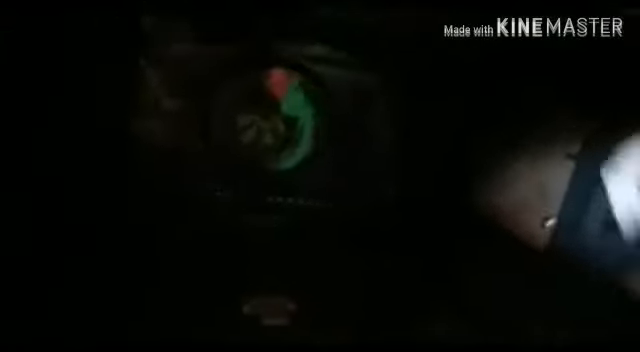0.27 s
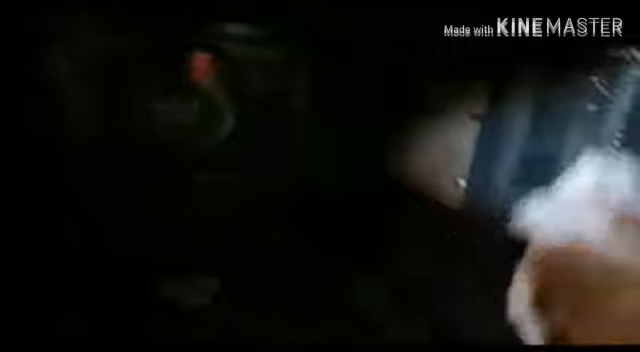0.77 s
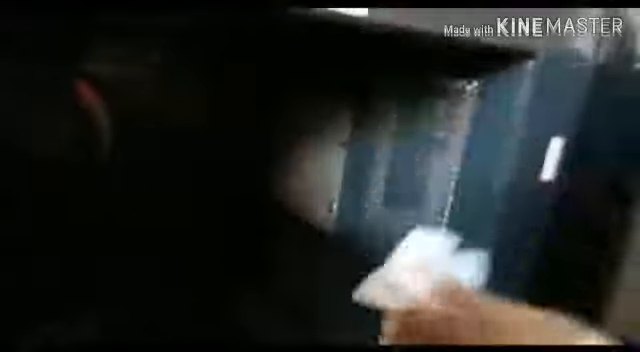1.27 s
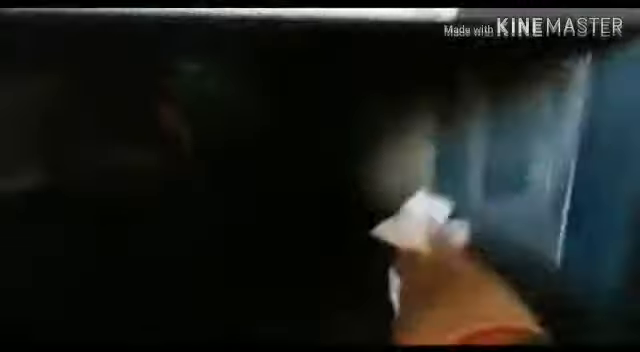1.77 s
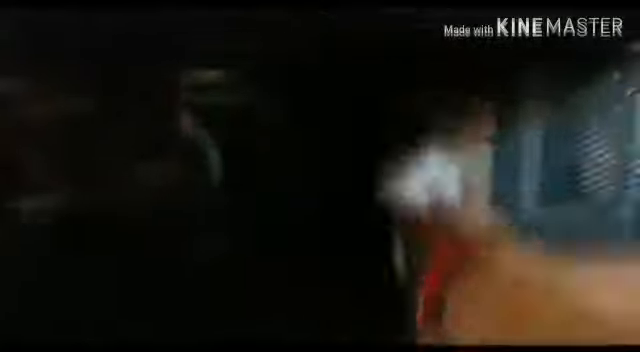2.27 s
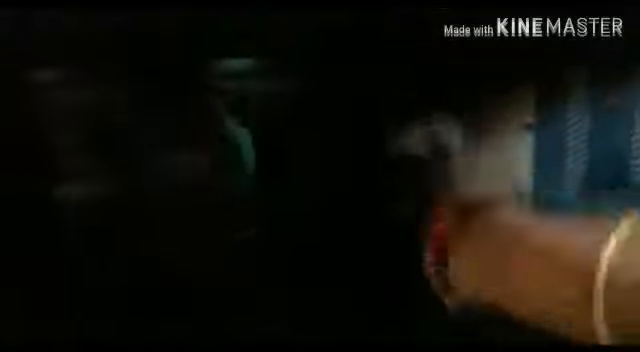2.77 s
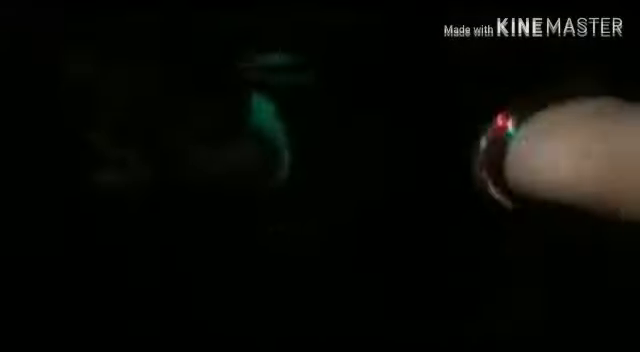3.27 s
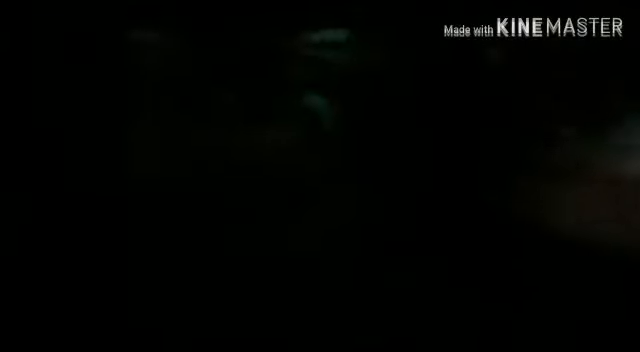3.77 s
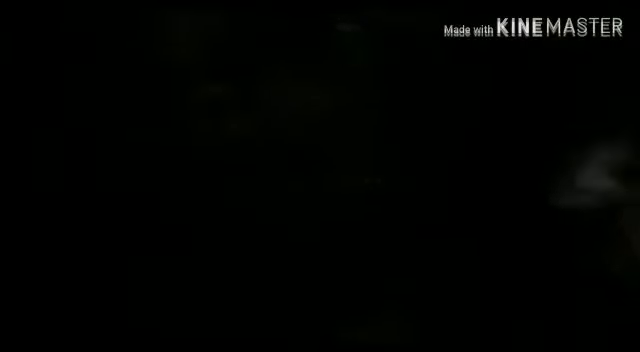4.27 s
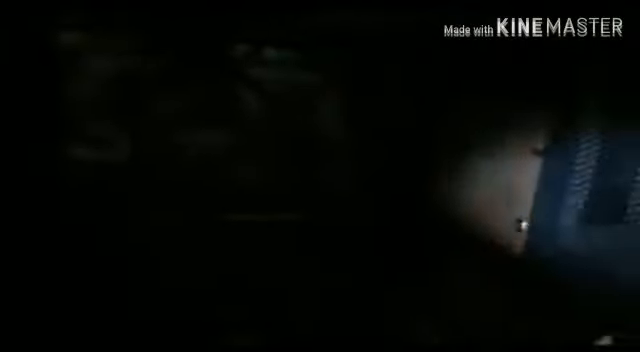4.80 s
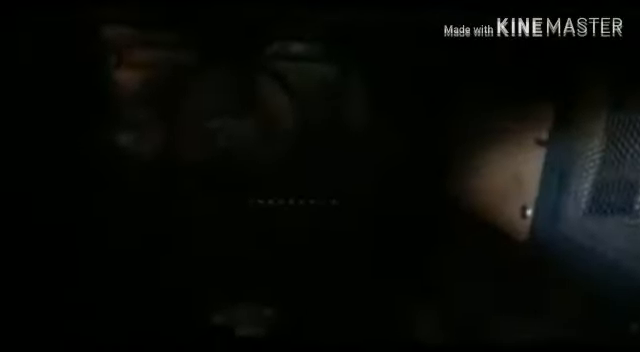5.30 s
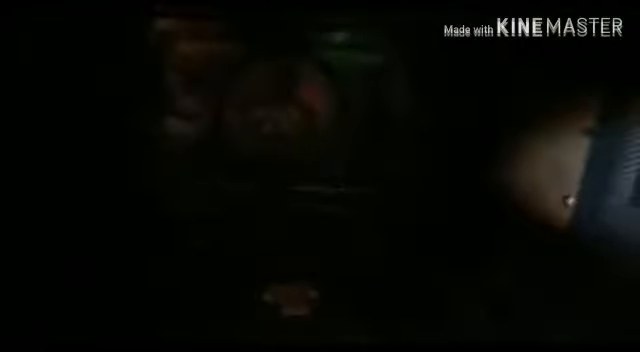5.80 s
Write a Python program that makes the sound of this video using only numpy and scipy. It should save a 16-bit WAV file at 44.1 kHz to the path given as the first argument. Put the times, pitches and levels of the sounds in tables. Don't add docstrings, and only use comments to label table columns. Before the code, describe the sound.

Close wet wiping strokes hiss inside an oven, with bangles tinkling on a wrist and a few hard clacks and hollow knocks.

```python
import sys
import numpy as np
from scipy import signal
from scipy.fft import rfft, irfft, next_fast_len
from scipy.io import wavfile
from scipy.ndimage import map_coordinates

SR = 44100
rng = np.random.default_rng(int(sys.argv[2]) if len(sys.argv) > 2 else 0)


def dump(signal):
    limited = np.clip(np.atleast_2d(signal).T, -1, 1)
    pcm = np.round(limited * 32767).astype(np.int16)
    wavfile.write(sys.argv[1], SR, pcm)


def gain_from_db(level_db):
    decades = np.asarray(level_db, float) / 20
    return 10 ** decades


N = 266628

# start_s, peak_db, upper_modes_db (re peak), panel_pitch_ratio
KNUCKLES = [(0.001, -43.5, -4.5, 0.88), (1.632, -36.5, 4, 1.02), (1.7462, -21.5, -8, 0.9),
            (1.756, -16, -14, 0.98), (2.374, -35.5, -15, 0.94), (2.758, -33, -3, 1),
            (2.877, -26.5, -6, 1.1), (2.892, -19.5, -25, 0.96), (3.8805, -5.5, -3, 1),
            (3.976, -18, -11, 0.92), (4.079, -33, 1, 1.11), (4.525, -33.5, -13, 0.99),
            (4.622, -51, 14, 0.85), (4.942, -32.5, -11, 1.04), (4.995, -51, -30, 0.89),
            (5.103, -44, -6, 0.99), (5.459, -41, -6, 0.87), (5.485, -30, -11, 0.97)]


def unit(x):
    return x / np.sqrt(np.mean(x ** 2) + 1e-20)


def along(points, hz):
    f, v = np.transpose(points)
    return np.interp(np.log(hz + 1), np.log(f + 1), v)


def wobble(rate):
    return map_coordinates(rng.standard_normal(N // 100 + 9), [np.arange(N) * rate / SR])


def filtered(x, response):
    m = next_fast_len(len(x) + SR // 4)
    return irfft(rfft(x, m) * response(np.fft.rfftfreq(m, 1 / SR)), m)[:len(x)]


def resonances(peaks):
    def response(f):
        total = 0
        for k, (centre, width, db) in enumerate(peaks):
            damping = 1j * f * width
            total = total + (-1) ** k * gain_from_db(db) * damping / (centre ** 2 - f ** 2 + damping)
        return total
    return response


def coloured(spectrum):
    return unit(filtered(rng.standard_normal(N + SR), lambda hz: gain_from_db(along(spectrum, hz))))


def rub(spectrum, grain_db):
    grains = rng.standard_normal(N) * gain_from_db(grain_db * wobble(300))
    return unit(filtered(grains, lambda hz: gain_from_db(along(spectrum, hz))))


def add(track, s, sound):
    track[round(s * SR):][:len(sound)] += sound


def ring(modes, t, damping, scatter_db, blur):
    hz, db, t60 = np.transpose(modes)[:, :, None]
    level_luck, pitch_luck = rng.standard_normal((2, len(modes), 1))[::-1]
    steps = rng.standard_normal((len(modes), len(t) // 16 + 1))
    steps = np.repeat(steps, 16, axis=1)[:, :len(t)]
    wander = blur * np.cumsum(steps, axis=1) / 4
    wave = np.sin(2 * np.pi * hz * (1 + 0.0048 * pitch_luck) * t + wander)
    return gain_from_db(db + scatter_db * level_luck - 60 * t * damping / t60) * wave


def swells(rows, peak, ease, rest_db):
    edge_db = 18
    t = np.arange(0, N + 32, 32) / SR
    peak = np.clip(peak, .05, .95)
    power = gain_from_db(2 * np.array(rest_db))[:, None] * np.ones(len(t))
    for s, length, db, second_db in rows:
        rising = (s - t) / (peak * length) + 1
        falling = (t - s - peak * length) / ((1 - peak) * length)
        away = np.maximum(rising, falling)
        power = power + gain_from_db(2 * (db - edge_db * away ** ease)) * gain_from_db([[0], [2 * second_db]])
    return [np.interp(np.arange(N) / SR, t, gain) for gain in np.sqrt(power)]


def wipe():
    # start_s, length_s, top_speed_db, pressure_db (re speed)
    strokes = [(-.3, 0.57, -48.5, -15), (.22, 0.27, -54.5, -14), (.42, 0.3, -49, -8),
               (.66, 0.6, -64.5, -5.5), (1.05, 0.21, -54, -10), (1.36, 0.29, -60.5, -8),
               (1.6, 0.28, -38, 2.5), (1.88, 0.43, -48.5, -2.5), (2.1, 0.42, -44, -1.5),
               (2.44, 0.37, -44, -4.5), (2.68, 0.45, -45.5, 0.5), (3.02, 0.25, -41, -4),
               (3.14, 0.43, -49.5, -3.5), (3.3, 0.38, -48, 2.5), (3.77, 0.33, -45.5, -3),
               (3.95, 0.6, -46, 0.5), (4.25, 0.5, -46.5, 0.5), (4.48, 0.38, -49, -0.5),
               (4.66, 0.13, -44.5, -4.5), (4.825, 0.13, -54, 5.5), (4.89, 0.21, -53.5, -4),
               (5.07, 0.2, -56, 0.5), (5.28, 0.26, -47, -12), (5.45, 0.17, -49.5, -2),
               (5.6, 0.37, -48, -16), (5.92, 0.47, -48.5, -18)]
    # start_s, length_s, push_db, flex_db (re push)
    leans = [(-.04, 0.16, -43, -29), (.25, 0.31, -52.5, -7), (.45, 0.21, -48.5, -30),
             (.88, 0.43, -63.5, 2.5), (1.13, 0.15, -54.5, -12), (1.43, 0.26, -50.5, -8.5),
             (1.85, 0.59, -48.5, 5.5), (2.365, 0.068, -39, -9), (2.5, 0.19, -45, -4.5),
             (2.69, 0.093, -43.5, -8), (3.05, 0.5, -52, 0.5), (3.3, 0.68, -56, 4.5),
             (3.55, 0.12, -44.5, -14), (3.78, 0.093, -61.5, -8), (4.05, 0.94, -49, -27),
             (4.51, 0.15, -44, -9.5), (4.61, 0.1, -59.5, 10.5), (4.82, 0.24, -47.5, -6),
             (4.92, 0.21, -55, -13), (5.08, 0.17, -45.5, -7), (5.5, 0.23, -44.5, -3), (5.82, 0.52, -70, 10)]
    # hiss_db, scrub_db, rumble_db, moan_db
    resting_db = (-87, -84.5, -77.5, -78)
    # start_s, end_s, ribs_per_s
    ribs = (4.0985, 4.775, 31.12)
    # frequency_hz, density_db
    hiss_colour = [(500, -33), (1470, -10), (2500, -11.5), (4010, 0), (5130, -2.5), (9420, 0), (12800, 0.5),
                   (15700, -8), (16100, -13.5), (16500, -83)]
    # frequency_hz, density_db
    scrub_colour = [(350, -1), (600, -1), (877, -5.5), (1020, 2.5), (1140, -7), (1500, -4), (2710, -4),
                    (4500, -1.5), (5850, -5.5), (9900, -120)]
    # frequency_hz, density_db
    rumble_colour = [(15, -81.5), (85, -26.5), (112, 0), (129, -6), (145, -14.5), (203, -2.5), (244, 1),
                     (296, -6), (330, -1), (430, -23), (730, -120)]
    # frequency_hz, density_db
    moan_colour = [(190, -29), (320, 4.5), (362, -8), (416, 4.5), (578, 3.5), (639, -6), (1000, -7),
                   (1300, -15.5), (2200, -120)]
    # frequency_hz, width_hz, level_db
    rubbed_modes = [(775, 80, 5.5), (880, 46, -1.5), (1283, 50, 1.5), (1504, 67, 3.5), (1863, 70, 5),
                    (2270, 68, 1), (2720, 73, -6), (3700, 190, -3.5), (4420, 120, -2.5)]
    t = np.arange(N) / SR

    speed, pressure = swells(strokes, peak=0.34, ease=1.92, rest_db=resting_db[:2])
    shudders = [(s + 0.0027, 0.1, .75 * db - 21, -6.5) for s, db, *_ in KNUCKLES]
    push, flex = swells(leans + shudders, peak=0.16, ease=1, rest_db=resting_db[2:])

    start, end, rate = ribs
    since_rib = (t - start) % (1 / rate)
    ripple_db = ((t > start) & (t < end)) * 6.5 * (2 * np.exp(-since_rib / .017) - 1)
    hiss = speed * gain_from_db(4.0 + ripple_db + wobble(25)) * rub(hiss_colour, grain_db=1.0)

    singing = resonances(rubbed_modes)
    pad = unit(filtered(rub(scrub_colour, grain_db=1.0), lambda hz: 1 + np.abs(singing(hz))))
    scrub = pressure * gain_from_db(0.07 * ripple_db + wobble(17)) * pad

    snaps_per_s, crackle_db = 260, -13
    snaps = (rng.random(N) < snaps_per_s / SR) * rng.standard_normal(N) * gain_from_db(4 * wobble(20))
    crackle = unit(filtered(snaps, resonances([(1500, 1400, 0.0052), (4200, 3000, 0.011)])))
    scrub += pressure * gain_from_db(crackle_db) * crackle

    rumble = push * gain_from_db(0.32 * wobble(16)) * rub(rumble_colour, grain_db=0.0)
    moan = flex * gain_from_db(wobble(7.5)) * rub(moan_colour, grain_db=0.0)
    return hiss + scrub + rumble + moan + squeaks()


def squeaks():
    # start_s, length_s, pitch_hz, level_db
    sticks = [(0.252, 0.042, 283, -45.5), (0.276, 0.058, 250.6, -44), (0.287, 0.048, 555, -52.5),
              (0.34, 0.063, 240.7, -55), (0.453, 0.15, 228, -54), (3.22, 0.08, 435, -52),
              (3.385, 0.18, 411, -43), (3.398, 0.39, 1404, -61.5), (4.062, 0.22, 216, -52),
              (4.25, 0.2, 209.6, -38.5), (4.956, 0.12, 81.2, -40), (4.992, 0.1, 117.9, -47),
              (5.113, 0.2, 117.2, -49), (5.84, 0.17, 568, -58)]
    out, t = np.zeros(N), np.arange(N) / SR
    flutter = np.cumsum(1 + 0.014 * wobble(40)) / SR
    grip_db = 2.5 * wobble(30)
    for s, length, hz, db in sticks:
        rasp = 300 / hz + wobble(hz / 5) * min((hz / 800) ** 2, 1)
        arch = np.sin(np.pi * np.clip((t - s) / length, 0, 1))
        swell = unit(rasp) * np.sqrt(np.abs(arch))
        out += swell * gain_from_db(db + grip_db) * np.sin(2 * np.pi * hz * flutter)
    return out


def clinks():
    # start_s, rattle_db, fourth_order_db, fifth_order_db (re rattle)
    wide_hits = [(0.4693, -2, -15.5, -14), (0.4762, -8, -19, -25), (0.5152, -14, -21, -17),
                 (1.061, -35, -1, -2), (1.0696, -9, -17, -11.5), (1.083, -14, -14, -16),
                 (1.1174, -20, -10, -13), (1.3533, -35, -15, -17), (1.696, -14.5, -8, -23),
                 (1.712, -8, -17, -22), (1.7433, -23, -29, -14), (3.9776, -11.5, -26, -26),
                 (4.037, -17, -14, -13), (4.065, -22, -17, -16), (4.273, -27, -16, -9),
                 (4.997, -28.5, -11, -6), (5.042, -10, -32, -22), (5.0642, -13, -17.5, -21),
                 (5.072, -23, -22, -23), (5.262, -36, -11, -20), (5.268, -17.5, -19.5, -35.5),
                 (5.4502, -18.5, -20.5, -19), (5.464, -20, -22, -15), (5.4898, -19, -16, -19),
                 (5.9159, -29, 0.5, -9), (5.9351, -16, -18, -12), (6.0017, -25.5, -19, -16),
                 (6.037, -31, -14, -25)]
    # start_s, rattle_db, fourth_order_db, fifth_order_db, narrow_db (re rattle)
    narrow_hits = [(1.0787, -15, -12, -12, -10), (1.0927, -25, -14, -16, -13), (1.635, -15, -7, -3, -6),
                   (1.6686, -17.5, -13, -12, -7), (1.7203, -9.5, -12, -14, -5.5),
                   (1.7347, -6, -11, -5, -9.5), (3.863, -38, -12, 0, -6), (5.309, -17, -10.5, -14, -16),
                   (5.3303, -22.5, -5, -14, -1), (5.347, -6.5, -15.5, -19.5, -23.5),
                   (5.927, -28, -10, -15, -5), (5.9488, -20, -11.5, -15, -26)]
    # start_s, level_db
    dull_touches = [(0.175, -33), (0.2399, -25), (0.6764, -33), (1.3828, -37), (1.4174, -28), (1.6164, -1),
                    (1.872, -24.5), (2.683, -6.5), (2.7167, 0.5), (2.8767, -23), (2.919, -22),
                    (2.9397, -37), (2.9623, -25), (4.2904, -19.5), (4.577, -18.5), (4.825, -44),
                    (4.861, -20.5), (4.9741, -27), (5.025, -23), (5.1447, -31), (5.3446, -9.5),
                    (5.4817, -14), (5.486, -6)]
    # frequency_hz, density_db
    rattle_colour = [(1470, -60.5), (2500, -33), (5650, -18), (7250, -18), (7710, -13.5), (10500, -3),
                     (13600, 0), (16000, -14.5)]
    # frequency_hz, level_db, t60_s
    glass_modes = [
        [(1560, -33, .05), (3765, -24, .06), (7910, -5, .1)],
        [(4124, -14, .09), (6020, -14, .07), (8230, -6, .09)],
        [(5655, -10, .08), (5775, -16, .06)],
        [(10190, -10, .08), (10410, -1, .1), (10560, -7, .07), (10780, -2, .1)],
        [(12750, -9, .07), (13135, -1, .1), (13510, -3, .09), (13700, -8, .07), (15350, -16, .06)],
        [(6761, -25, .05), (9000, -21, .06), (11070, -10, .07), (11430, 0, .09), (14120, -2, .07),
         (14310, -8, .06)],
    ]
    # time_s, first_bangle_db, second_bangle_db, both_db
    skin_slack = [(.47, -19, -25, -25), (.52, -30, -22, -26), (1.1, -14, -25.5, -18.5),
                  (1.4, -28, -35, -31), (1.73, -21, -26, -22), (3.9, -26, -26, -29), (4.06, -35, -35, -37),
                  (4.28, -17, -16, -16), (5.0, -33, -35, -31), (5.06, -26, -21.5, -22),
                  (5.27, -22.5, -36.5, -28), (5.35, -22.5, -30, -26), (5.47, -24, -33, -30),
                  (5.9, -29, -28, -26.5)]
    narrow_idle_db = -31
    low_lag = 0.34

    out, t = np.zeros(N + SR), np.arange(SR // 9) / SR
    for s, db, *_ in wide_hits + narrow_hits + dull_touches:
        rattle = gain_from_db(-10.5 - 60 * t / 0.043) + gain_from_db(-15 - 60 * t / 0.0052)
        add(out, s, gain_from_db(db) * rattle * (1 - np.exp(-t / 0.00065)))
    out *= coloured(rattle_colour)

    contacts = sorted([(*row, narrow_idle_db) for row in wide_hits] + narrow_hits)
    free_s = np.minimum(np.diff([row[0] for row in contacts], append=N), .02)
    slack_s, *slack_db = np.transpose(skin_slack)
    for (s, db, *strength_db), hold in zip(contacts, free_s):
        choke = .1 + .9 * np.exp(-np.maximum(t - hold, 0) / .006)
        low_db = [np.interp(s, slack_s, free_db) - low_lag * db for free_db in slack_db]
        for modes, hit_db in zip(glass_modes, [*low_db, *strength_db]):
            rows = ring(modes, t, damping=.8, scatter_db=2.5, blur=.055) * (1 - np.exp(-t / .0004))
            add(out, s, gain_from_db(db + 1.18 * hit_db + 4.0) * choke * rows.sum(0))
    return out[:N]


def clacks():
    # start_s, peak_db, treble_db (re peak), t60_s
    landings = [
        [(0.4697, -31, 15, 0.016), (1.6172, -13, -2, 0.12), (1.6203, -6.5, -11.5, 0.068),
         (1.6297, 2.5, -21, 0.025), (1.6434, -21, -12.5, 0.14)],
        [(2.6808, -11.5, -10, 0.051), (2.6845, -12.5, -13.5, 0.31), (2.7115, -4, -12, 0.042),
         (2.7205, 1.5, -11.5, 0.037), (2.7346, -3, -15, 0.068), (2.7445, -7, -18.5, 0.055),
         (2.7529, -17, -21.5, 0.071), (3.1066, -31.5, -3, 0.25)],
        [(1.071, -45, -20, 0.099), (1.742, -20, -19, 0.11), (2.0148, -42, 0, 0.13), (2.3675, -24, -21, 0.08),
         (2.881, -23.5, -11, 0.08), (3.8841, -10, -10.5, 0.083), (3.8925, -4, -16, 0.056),
         (4.263, -33.5, -4, 0.51), (4.283, -34, -14, 0.051), (4.3315, -22, -19, 0.044), (4.365, -32, -9, .05),
         (4.43, -44, -18, .05), (4.535, -35, -4, 0.1), (4.63, -38, -18, 0.094), (4.823, -38.5, -4.5, 0.082),
         (4.861, -37.5, 5.5, 0.047), (5.095, -42.5, -6, 0.12), (5.475, -56, -16, 0.14)],
    ]
    # frequency_hz, density_db
    wall_colours = [
        [(500, -23), (950, -20), (1200, -2.5), (1600, -10.5), (2000, -12), (2400, -2), (3020, 4), (3450, -8),
         (3950, -12), (5140, -4), (7000, -30), (15400, -120)],
        [(450, -42), (780, -10.5), (1200, -6.5), (1550, -9), (2000, 0.5), (2450, -3.5), (3020, 2.5), (3500, -5),
         (4300, -3.5), (4900, -4.5), (7000, -32.5), (15400, -120)],
        [(400, -26), (850, 2), (1300, -5), (1600, -4.5), (1900, 0.5), (2400, -4), (2850, -1), (3600, -8),
         (4900, -8), (7000, -30), (15400, -120)],
    ]
    # frequency_hz, level_db, t60_s
    wall_modes = [
        [(1810, -20, 0.097), (2830, -3, .07), (4660, -15, .09), (5020, -12.5, .05), (5360, -4.5, .09)],
        [(787, -20, 0.12), (1155, -9, 0.059), (3370, -8.5, .07), (3800, -8, .07), (4600, -6, 0.054)],
        [(830, -8.5, .08), (1248, -5, 0.059), (1848, -9.5, 0.069), (2520, -8.5, 0.079), (3060, -8, 0.11),
         (4540, -10, 0.079), (4930, -5, 0.1)],
    ]
    # start_s, frequency_hz, level_db, t60_s
    single_modes = [(1.6185, 2962, -7.5, 0.057), (1.619, 2275, -10, 0.052), (1.621, 1230, -20, 0.053),
                    (1.621, 3900, -15.5, 0.087), (1.632, 2455, -19, 0.19), (1.632, 3006, -19, 0.13),
                    (1.632, 4150, -19, 0.12), (2.684, 2472, -14.5, 0.13), (2.685, 3010, -12.5, .05),
                    (2.71, 3050, -4.5, .035), (2.71, 1255, -17, 0.07), (2.716, 2465, -4.5, 0.053),
                    (2.72, 2322, -10, .045), (2.72, 4290, -16.5, .12), (2.734, 2720, -11, .05),
                    (2.747, 2700, -15.5, 0.059), (2.734, 1850, -13.5, 0.084), (2.735, 2050, -19, 0.061),
                    (2.755, 2280, -20.5, 0.0934), (2.757, 2800, -31, .06), (4.535, 1006, -47.5, .15),
                    (4.63, 600, -47, .15), (4.65, 495, -47, .15), (4.95, 722, -48, 0.11),
                    (5.095, 696, -51, 0.29), (5.46, 578, -46, 0.14)]

    noise, fizz, tones = np.zeros((3, N + SR))
    t = np.arange(SR // 6) / SR
    onset = 1 - np.exp(-t / 0.0012)
    for contacts, colour, modes in zip(landings, wall_colours, wall_modes):
        body = np.zeros(N + SR)
        for s, db, treble_db, t60 in contacts:
            blow = gain_from_db(db - 7.0) * onset
            add(tones, s, gain_from_db(db + treble_db - 8) * np.hanning(SR // 4000))
            add(body, s, blow * gain_from_db(-60 * t / t60))
            add(fizz, s, blow * gain_from_db(treble_db + 8.5 - 60 * t / (0.85 * t60)))
            rows = ring(modes, t, damping=0.13 / t60, scatter_db=0.0, blur=.045)
            add(tones, s, blow * gain_from_db(-1.0) * rows.sum(0))
        noise = noise + gain_from_db(-1.5) * body * coloured(colour)
    for s, *mode in single_modes:
        add(tones, s, ring([mode], t, damping=1, scatter_db=0, blur=.02)[0] * onset)

    fizz = fizz * coloured([(3500, -33.0), (6000, 0.5), (16000, -2.5)])
    chatter = gain_from_db(1.0 * wobble(400))
    return chatter * (noise + fizz)[:N] + tones[:N]


def knocks():
    # frequency_hz, level_db, t60_s
    cavity_modes = [(90, -32, .6), (118, -9, .6), (193, -2, .24), (233, 2, .3), (260, -2, .2),
                    (310, -16, .24), (358, -24, .3), (401, -12, .45), (430, -19, .2), (500, -16, .3),
                    (577, -9, .24), (640, -11, .14), (686, -10, .18), (745, -15, .2), (825, -19, .15),
                    (903, -22, .15), (1014, -14, .16), (1050, -15, .13), (1240, -26, .06)]
    out, t = np.zeros(N + SR), np.arange(SR // 2) / SR
    modes = np.array(cavity_modes)
    upper, panel = modes[:, :1] > 340, modes[:, :1] > 150
    for s, db, upper_db, ratio in KNUCKLES:
        loaded = np.where(panel, modes * [ratio, 1, 1], modes)
        rows = ring(loaded, t, damping=1.5, scatter_db=1.2, blur=0.003)
        rows = rows * gain_from_db(upper * (upper_db + 8))
        add(out, s, gain_from_db(db - 2) * (1 - np.exp(-t / 0.0035)) * rows.sum(0))
    return out[:N]


def kitchen(x):
    # frequency_hz, t60_s
    room_decay = [(200, 1), (2500, 0.33), (8000, 0.22), (14000, 0.18)]
    out, step = np.zeros(N + 2 * SR), SR // 3
    for k in range(0, N, step):
        hz, t, z = signal.stft(rng.standard_normal(SR // 2), SR, nperseg=256)
        decay = gain_from_db(-60 * t / along(room_decay, hz)[:, None])
        tail = signal.istft(z * decay, SR, nperseg=256)[1]
        answer = signal.fftconvolve(x[k:k + step], tail / np.linalg.norm(tail))
        add(out, k / SR + 0.0043, answer)
    return out[:N]


def scene():
    # frequency_hz, width_hz, level_db
    port_difference = [(1865, 260, -10), (9850, 450, -7.5), (4800, 2500, -27), (950, 1000, -26),
                       (2700, 1000, -16), (11200, 500, -18)]
    glass, steel, boom = clinks(), clacks(), knocks()
    room = kitchen(gain_from_db(-8.5) * glass + gain_from_db(-8.5) * steel + gain_from_db(-16.5) * boom)
    mid = glass + steel + boom + wipe() + room
    side = filtered(mid, resonances(port_difference))
    return np.array([mid + side, mid - side])


def roll_off(x):
    return signal.sosfilt(signal.butter(12, 16650, fs=SR, output="sos"), x)


def record(dry):
    # frequency_hz, gain_db
    mic_response = [(20, -62), (48, -44), (68, -19), (105, 0), (15500, 0), (15900, -30), (16600, -42),
                    (17000, -90)]
    # frequency_hz, density_db
    floor_colour = [(15, -28), (40, -12.5), (80, 3), (242, -7.5), (416, -13.5), (2110, -26), (2280, -25.5),
                    (2690, -31.5), (3720, -26.5), (9320, -12), (11000, -11), (16000, -22.5)]
    clipped = dry / (1 + np.abs(dry / .98) ** 5) ** (1 / 5)
    trimmed = np.array([filtered(x, lambda hz: gain_from_db(along(mic_response, hz))) for x in clipped])
    shared = rub(floor_colour, grain_db=-1.5)
    opposed = np.outer([1, -1], rub(floor_colour, grain_db=-7.5))
    floor = gain_from_db(-59.0) * (shared + gain_from_db(-17) * opposed)
    return roll_off(trimmed + floor)


dry = scene()
out = record(dry)
dump(out)
```